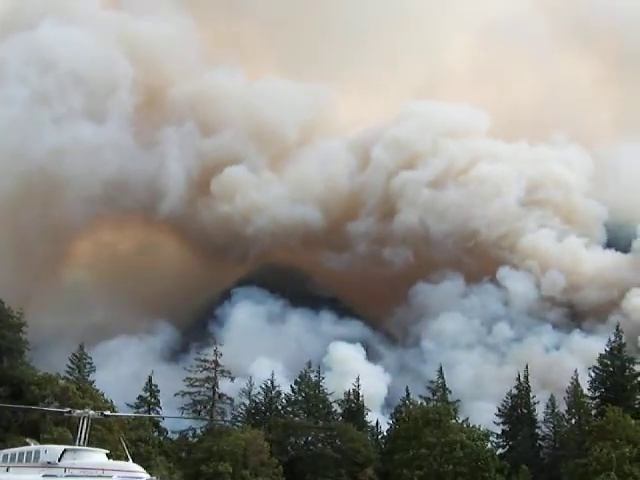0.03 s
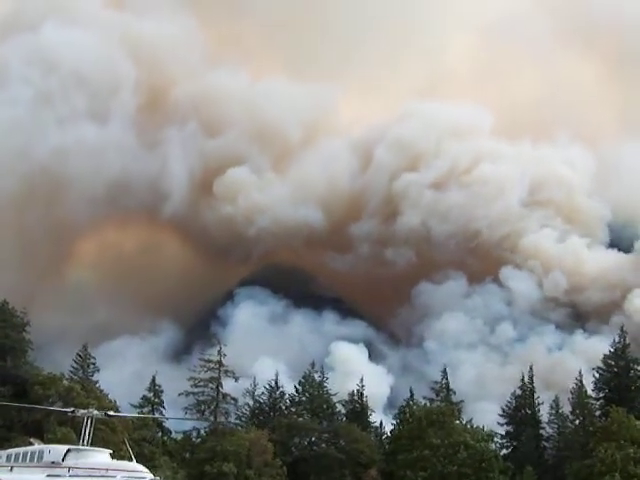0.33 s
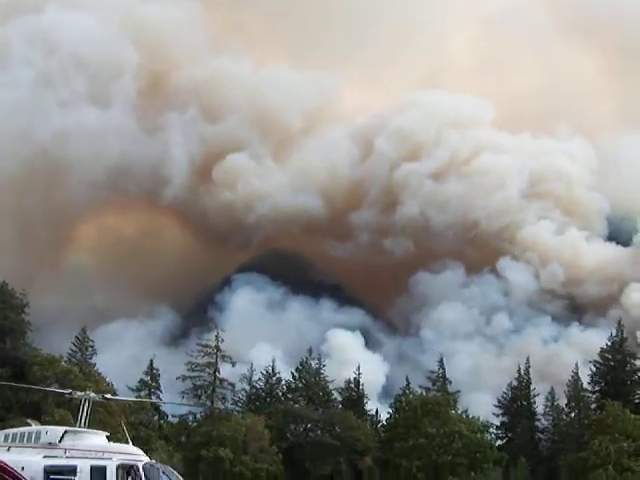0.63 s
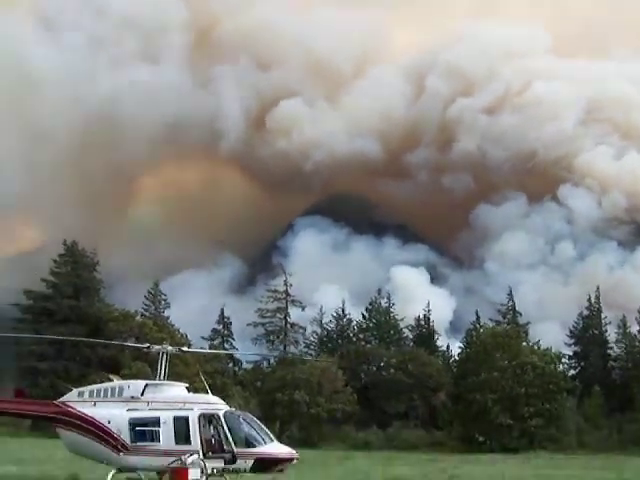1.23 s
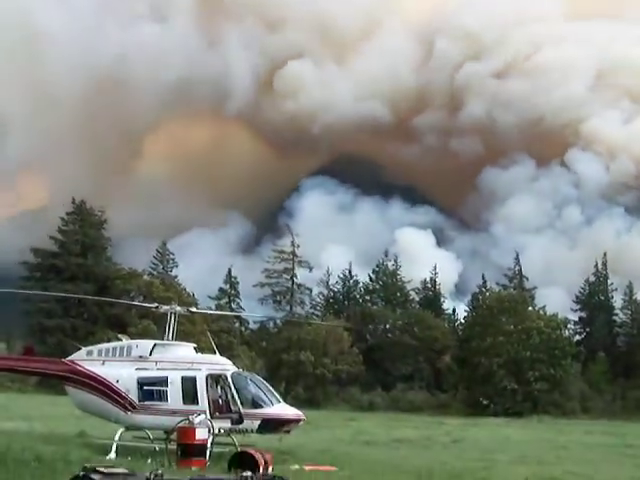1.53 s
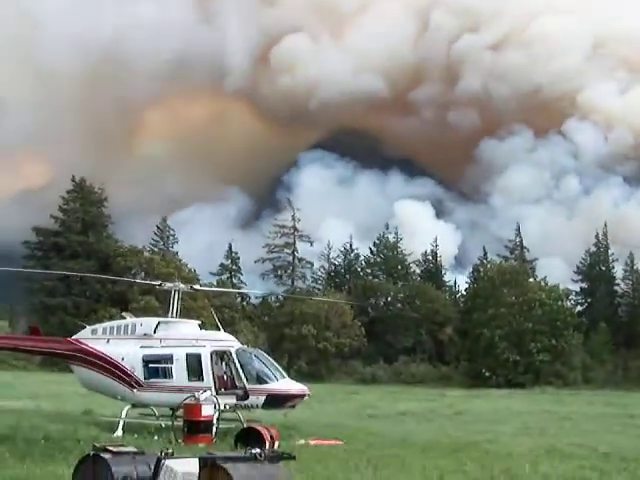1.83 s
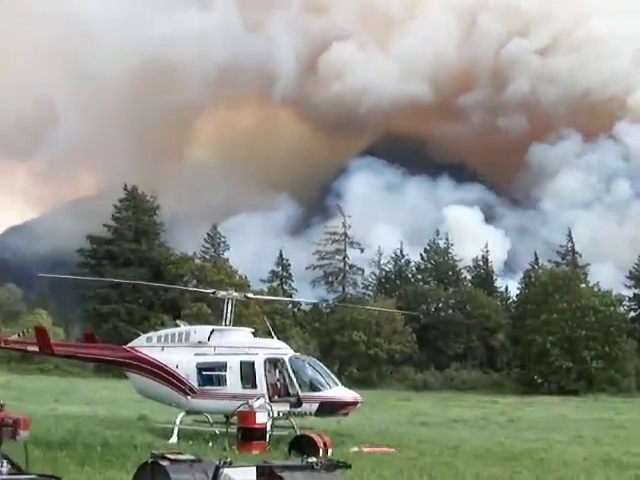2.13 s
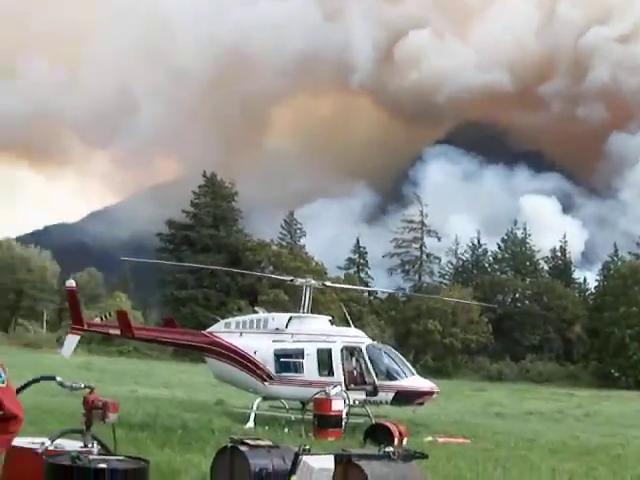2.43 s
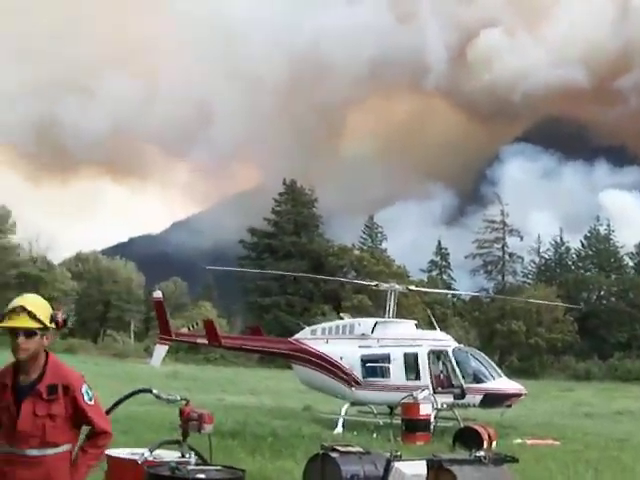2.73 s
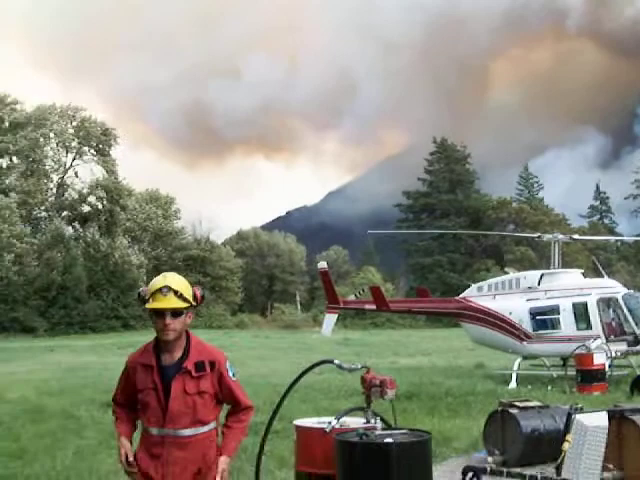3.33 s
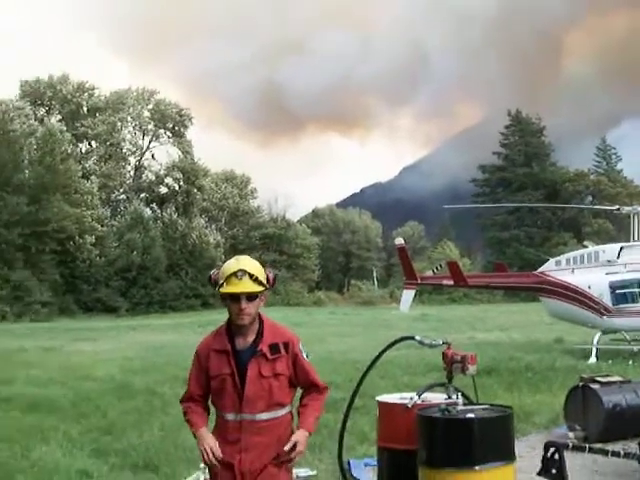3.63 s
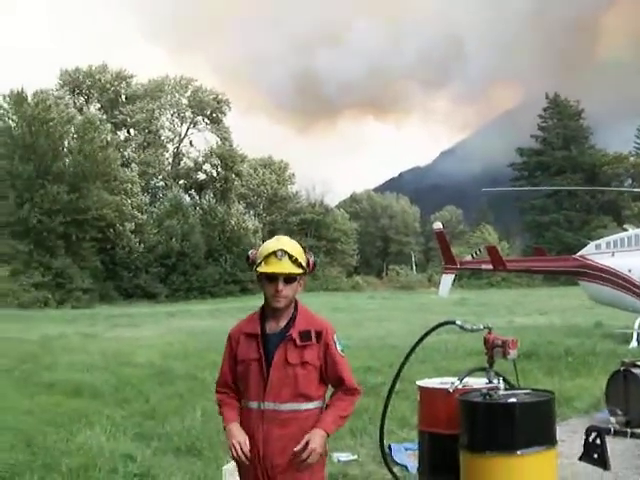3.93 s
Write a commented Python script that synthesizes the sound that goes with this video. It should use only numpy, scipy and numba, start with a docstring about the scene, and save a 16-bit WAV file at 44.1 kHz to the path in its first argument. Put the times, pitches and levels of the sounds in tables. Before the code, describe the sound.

Chopping, hissing roar of an approaching helicopter grows above wind rumble and a distant drone.

```python
"""A light helicopter swells closer over a meadow: rotor tones, blade swish, hiss and a turbulent roar chopped
by both rotors. A heavy helicopter's tail rotor drones far off, over a low rumble of wind and engines. A
camcorder with a hissy treble resonance listens; a few clicks ring its body and the two loudest make its limiter
duck. One short high squeak comes near the end."""
import sys
import numpy as np
from scipy import signal
from scipy.fft import rfft, irfft
from scipy.io import wavfile
from scipy.ndimage import uniform_filter1d
from numba import njit

SR = 44100
rng = np.random.default_rng(int(sys.argv[2]) if len(sys.argv) > 2 else 0)


def pcm_store(signal):
    """Save signal as 16-bit PCM."""
    levels = np.round(np.clip(np.atleast_2d(signal), -1, 1) * 32767)
    wavfile.write(sys.argv[1], SR, levels.astype(np.int16).T)


N = 176400
TIME_S = np.arange(N) / SR


def undb(db):
    return 10 ** (np.asarray(db) / 20)


def unit_rms(x):
    return x / np.sqrt(np.mean(x ** 2))


def curve(rows, column=1):
    """Table column, interpolated in time."""
    rows = np.array(rows)
    return np.interp(TIME_S, rows[:, 0], rows[:, column])


def pan(left_minus_right_db):
    return undb(np.array([[left_minus_right_db], [-left_minus_right_db]]) / 2)


def drift(rate_hz):
    """Smooth random signal, unit RMS."""
    hold = max(int(SR / rate_hz), 2)
    steps = np.repeat(rng.standard_normal(N // hold + 1), hold)
    return unit_rms(uniform_filter1d(uniform_filter1d(steps, hold), hold)[:N])


def response(points):
    """Gain per FFT bin from (Hz, dB) points."""
    hz, db = np.array(points).T
    bins_hz = np.arange(N // 2 + 1) * SR / N
    return undb(np.interp(np.log(bins_hz + 1), np.log(hz), db))


# Stereo width of the noise (frequency [Hz], side minus mid [dB])
WIDTH = [(30, -23), (120, -15.5), (300, -17), (550, -16), (900, -9), (1500, -6.5), (2500, -0.5),
         (8000, -0.5)]
def noise(spectrum, gate=1):
    """Gated, coloured stereo noise, widest in the treble."""
    colour = response(spectrum + [(1.5 * spectrum[-1][0], -90)])
    mid, side = rfft(rng.standard_normal((2, N)) * gate) * colour
    mid, side = irfft(mid, N), irfft(side * response(WIDTH), N)
    return (mid + side * np.array([[1], [-1]])) / np.std(mid)


def blade_passes(hz, wobble):
    """Running pass count at a wavering rate."""
    return np.cumsum(hz * (1 + wobble * drift(3.06))) / SR


def chop(passes, depth, width_cycles, scatter_db):
    """Unity gain plus a pulse of random strength per blade pass."""
    strength = undb(scatter_db * rng.uniform(-1.7, 1.7, 1024))[passes.astype(int) % 1024]
    return 1 + depth * strength * np.exp(-((passes % 1 - .5) / width_cycles) ** 2)


def rotor(passes, harmonics, flutter):
    """Suction pulses; the long path shifts each harmonic and moving air makes it fade."""
    shifts_cycles = 0.16 * rng.standard_normal(len(harmonics))
    pulses = 0
    for (order, db), shift in zip(harmonics, shifts_cycles):
        tone = np.exp(2j * np.pi * (order * (passes - .5) + shift))
        fading = 1 + flutter * (drift(7.22) + 1j * drift(7))
        pulses -= undb(db) * np.real(tone * fading)
    return pulses * np.sqrt(2 / (1 + 2 * flutter ** 2))


# Heavy tail rotor spectrum (harmonic [n], level [dB])
HEAVY_HARMONICS = [(1, -15.5), (2, -11), (3, -0.5), (4, -6.5), (5, -13), (6, -16)]
# Lift of its 4th harmonic (time [s], gain [dB])
HEAVY_FOURTH = [(0, 7), (.35, 3.5), (.7, -1.5), (4, -2)]
# Its envelope (time [s], level [dB])
HEAVY_LEVEL = [(0, -36), (.12, -37), (.23, -20.5), (.42, -21), (.62, -23), (.85, -25.5), (1.3, -25),
               (1.55, -27.5), (1.74, -31.5), (1.95, -22.5), (2.33, -20.5), (2.55, -25), (2.9, -36),
               (3.5, -28), (3.72, -23.5), (4, -34)]
def heavy_helicopter(blade_hz=55.12, gain_db=2):
    """Drone of a far tail rotor."""
    harmonics = [(order, db + (order == 4) * curve(HEAVY_FOURTH)) for order, db in HEAVY_HARMONICS]
    drone = rotor(blade_passes(blade_hz, wobble=0.002), harmonics, flutter=0.18)
    return drone * undb(curve(HEAVY_LEVEL) + gain_db) * pan(-1.5)


# Main rotor spectrum (harmonic [n], level [dB])
MAIN_HARMONICS = [(1, -23), (2, -28.5), (3, -28), (4, -28.5)]
# Sharpness of its thump (time [s], tilt [dB/octave])
MAIN_TILT = [(0, 0), (1.1, -1), (1.5, 1), (2.3, 1.5), (3, 2), (4, -3.5)]
# Tail rotor spectrum (harmonic [n], level [dB])
TAIL_HARMONICS = [(1, -18.5), (2, -12), (3, 0), (4, 1.5), (5, -2.5), (6, -5.5), (7, -14.5)]
# Tail rotor envelope (time [s], level [dB])
TAIL_LEVEL = [(0, -42.5), (1.7, -42), (2.4, -30), (3.2, -26), (4, -26.5)]
def light_rotors(main, tail):
    """Main rotor thump and a tail rotor tone that grows as the machine nears."""
    tilted = [(order, db + np.log2(order) * curve(MAIN_TILT)) for order, db in MAIN_HARMONICS]
    thump = rotor(main, tilted, flutter=0.22)
    hum = rotor(tail, TAIL_HARMONICS, flutter=0.36) * undb(curve(TAIL_LEVEL))
    return (thump + hum) * pan(-1.5)


# Roar before the turn (frequency [Hz], density [dB])
ROAR_EARLY = [(150, -32.5), (260, -6), (360, -5.5), (430, -4.5), (520, 0), (620, -5.5), (700, -4.5),
              (820, -4), (980, -8), (1250, -20)]
# Roar after the turn (frequency [Hz], density [dB])
ROAR_LATE = [(130, -18.5), (260, -1.5), (315, -4), (450, -1.5), (640, -3), (735, -12.5), (830, -7),
             (950, -7.5), (1250, -30.5)]
def roar(main, tail_chop, turn_s=2.826, turn_length_s=0.23):
    """Turbulence chopped by both rotors; deepens as the machine turns."""
    turn = np.clip((TIME_S - turn_s) / turn_length_s + .5, 0, 1)
    gate = tail_chop * chop(main, depth=0.2, width_cycles=0.2, scatter_db=2)
    turbulence = np.sqrt(1 - turn) * noise(ROAR_EARLY, gate) + np.sqrt(turn) * noise(ROAR_LATE, gate)
    return turbulence * undb(.5 * drift(14))


# Treble hiss (frequency [Hz], density [dB])
HISS_SPECTRUM = [(2500, -12), (3800, -12.5), (4400, -8.5), (5050, 0), (5600, -5), (6100, -4), (6800, -12.5),
                 (7500, -22), (8200, -34.5), (8800, -48)]
def hiss(main):
    """Resonant hiss near 5 kHz, barely chopped."""
    return noise(HISS_SPECTRUM, chop(main, depth=0.028, width_cycles=0.15, scatter_db=4))


# Blade swish bands (centre [Hz], level [dB])
SWISH_BANDS = [(1250, 2.5), (1650, 2), (2150, -1), (2850, -5.5)]
def swish(main, tail_chop):
    """Each main blade rasps with its own strength in each band."""
    rasp = 0
    for hz, db in SWISH_BANDS:
        band = [(hz * 0.76, -35), (hz * 0.81, -3), (hz, 0), (hz * 1.094, -3), (hz * 1.8, -35)]
        gate = tail_chop * chop(main, depth=.8, width_cycles=.2, scatter_db=3.8)
        rasp += noise(band, gate) * undb(db)
    return rasp / np.std(rasp)


# Approach envelopes (time [s], roar level [dB], hiss and swish levels in the order swish [dB], hiss [dB])
APPROACH = [(0, -29.5, -34.5, -30), (.12, -25, -36.5, -29.5), (.2, -24.5, -35.5, -25),
            (.36, -20, -36, -25.5), (.6, -27, -35.5, -30), (1.0, -28, -37.5, -31.5), (1.45, -29, -36, -32),
            (1.75, -24.5, -31, -29), (2.0, -23.5, -28, -25.5), (2.4, -19.5, -28, -25.5),
            (2.66, -18.5, -25.5, -25), (2.75, -20.5, -27, -27), (2.95, -19, -31, -27.5),
            (3.3, -17.5, -32, -28), (3.6, -14.5, -27.5, -25.5), (3.75, -15, -31.5, -26),
            (3.83, -21, -36, -28), (4, -13.5, -34.5, -27)]
ROAR_PAN_DB = -4
def light_helicopter(main_blade_hz=27.61, tail_blade_hz=84.04, roar_db=1, swish_db=2.5, hiss_db=2.5):
    """Nearing machine: two rotors time all its tones and turbulence."""
    main = blade_passes(main_blade_hz, wobble=0.0032)
    tail = blade_passes(tail_blade_hz, wobble=0.0023)
    out = light_rotors(main, tail)
    tail_chop = chop(tail, depth=0.72, width_cycles=0.13, scatter_db=2.5)
    out += roar(main, tail_chop) * undb(curve(APPROACH) + roar_db) * pan(ROAR_PAN_DB)
    out += hollow_resonance(tail_chop) * pan(ROAR_PAN_DB)
    out += hiss(main) * undb(curve(APPROACH, column=3) + hiss_db) * pan(-1)
    out += swish(main, tail_chop) * undb(curve(APPROACH, column=2) + swish_db) * pan(-3)
    return out


# Rumble spectrum (frequency [Hz], density [dB])
RUMBLE_SPECTRUM = [(12, -11), (30, -4.5), (60, -2.5), (105, -3.5), (190, -3.5), (300, -14.5), (600, -32),
                   (1200, -45.5)]
# Rumble envelope (time [s], level [dB])
RUMBLE_LEVEL = [(0, -24), (.22, -19.5), (.6, -29), (1.5, -23), (4, -21.5)]
def rumble():
    """Low wash of wind and far engines."""
    return noise(RUMBLE_SPECTRUM) * undb(curve(RUMBLE_LEVEL)) * pan(-0.5)


def burst(peak_s, hz, db, half_length_s):
    """Short swell of narrow-band noise."""
    band = noise([(hz * .7, -40), (hz * .92, -2), (hz * 1.06, 0), (hz * 1.3, -20)])
    return band * undb(db) * np.exp(-((TIME_S - peak_s) / half_length_s) ** 4)


# Roar flares (time [s], centre [Hz], level [dB])
FLARES = [(.17, 352, -24), (.335, 837, -26), (2.26, 430.3, -19), (3.77, 840, -21)]
def flares():
    """Single bands of the roar stand out briefly."""
    return sum(burst(*flare, half_length_s=0.031) for flare in FLARES) * pan(ROAR_PAN_DB)


# Clicks on the camera body (time [s], level [dB], ring [Hz])
CLICKS = [(.3672, 3.5, 4950), (.7162, -14.5, 5400), (.723, -15, 5030), (2.6824, 2, 5480),
          (2.6838, -6.5, 5670)]
# Their crack (frequency [Hz], density [dB])
CRACK_SPECTRUM = [(900, -10.5), (2400, -5.5), (3900, -1.5), (5900, 1), (8500, -18)]
def clicks(rise_s=0.00056, crack_db=-8):
    """Each click cracks and rings a high body mode for a few milliseconds."""
    crack = undb(crack_db) * noise(CRACK_SPECTRUM)
    out = 0
    for start_s, db, hz in CLICKS:
        age_s = np.maximum(TIME_S - start_s, 0)
        ring = np.sin(2 * np.pi * hz * age_s)
        envelope = age_s / rise_s * np.exp(1 - age_s / rise_s)
        out += undb(db) * (ring + crack) * envelope
    return out * pan(-8)


# Resonance in the roar (time [s], centre [Hz], level [dB])
HOLLOW = [(1.55, 488.8, -45.5), (1.95, 505, -20.5), (2.35, 540, -17.5), (2.5, 611.5, -16), (2.64, 720, -24),
          (2.78, 451.8, -35), (3.15, 470, -20.5), (3.65, 500, -16.5), (3.85, 451, -25)]
def hollow_resonance(tail_chop, width_hz=150):
    """Narrow band of turbulence that glides up with each late swell."""
    baseband = drift(2 * width_hz) + 1j * drift(2 * width_hz)
    band = baseband * np.exp(2j * np.pi * np.cumsum(curve(HOLLOW)) / SR)
    return unit_rms(band.real * tail_chop) * undb(curve(HOLLOW, column=2))


def squeak():
    """Short, high and scratchy."""
    return burst(peak_s=3.767, hz=3350, db=-22.5, half_length_s=0.016)


def scene():
    return heavy_helicopter() + light_helicopter() + flares() + rumble() + clicks() + squeak()


@njit
def follow_peaks(peak, limit, attack, release):
    """Rises fast, sinks slowly back to the limit."""
    out, held = np.empty(len(peak)), limit
    for i in range(len(peak)):
        held = held + (peak[i] - held) * attack if peak[i] > held else max(limit, held * release)
        out[i] = held
    return out


def limiter(x, limit=0.98, attack_s=0.00021, release_db_per_s=23.5):
    """Ducks both channels after a loud peak."""
    attack = 1 - np.exp(-1 / (attack_s * SR))
    release = float(undb(-release_db_per_s / SR))
    return x * limit / follow_peaks(np.abs(x).max(axis=0), limit, attack, release)


# Capsule mismatch (frequency [Hz], left minus right [dB])
CAPSULE_BALANCE = [(30, 1), (120, -1), (300, 0), (900, 1.5), (2200, -1.5), (4000, -7), (6500, 9)]
def record(dry, right_low_cut_hz=37, ceiling=.94, top_hz=8400):
    """Unequal capsules, limiter, clipping of overshoot, low-pass."""
    tilt = np.sqrt(response(CAPSULE_BALANCE))
    left, right = irfft(rfft(dry) * np.array([tilt, 1 / tilt]), N)
    right = signal.sosfilt(signal.butter(1, right_low_cut_hz, "high", fs=SR, output="sos"), right)
    limited = np.clip(limiter(np.array([left, right])), -ceiling, ceiling)
    return signal.sosfilt(signal.ellip(8, .2, 70, top_hz, fs=SR, output="sos"), limited)


dry = scene()
out = record(dry)
pcm_store(out)
```